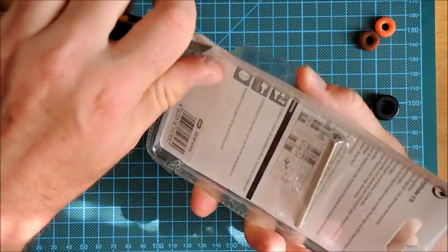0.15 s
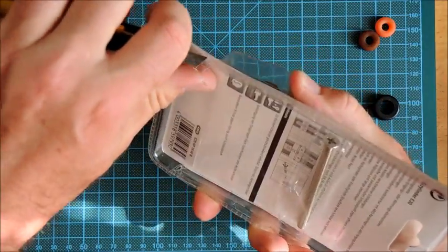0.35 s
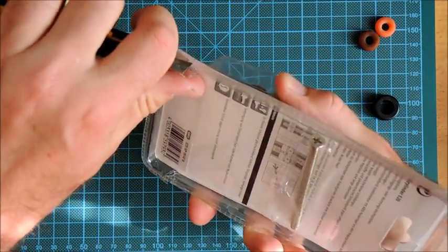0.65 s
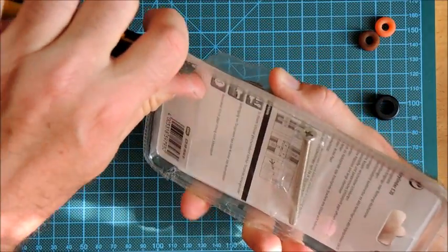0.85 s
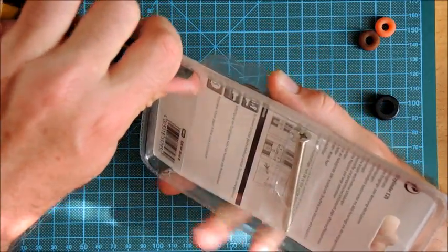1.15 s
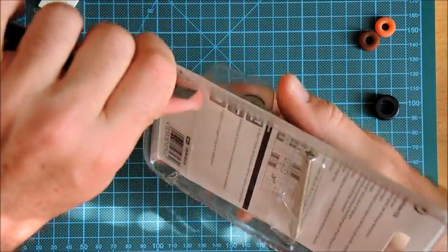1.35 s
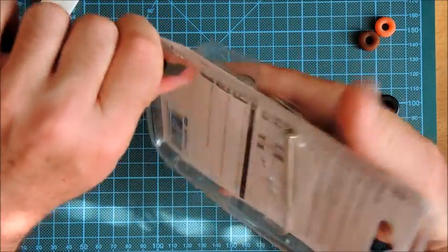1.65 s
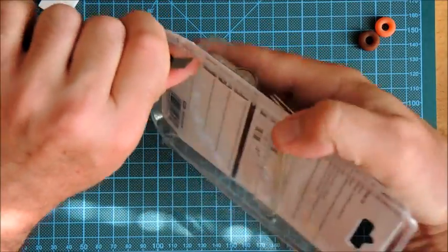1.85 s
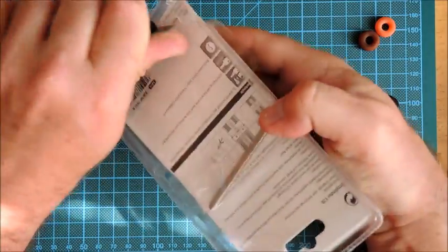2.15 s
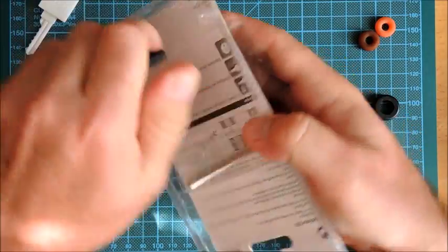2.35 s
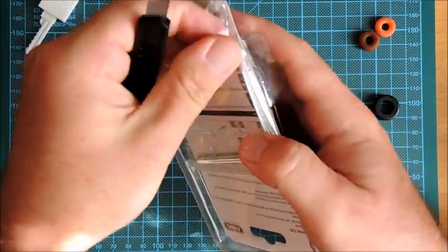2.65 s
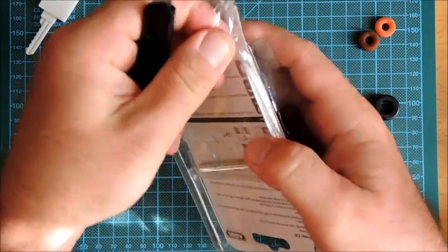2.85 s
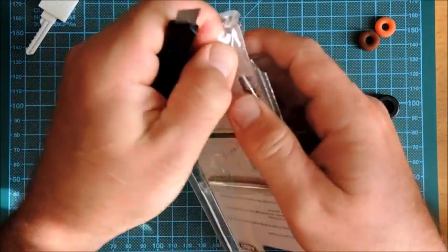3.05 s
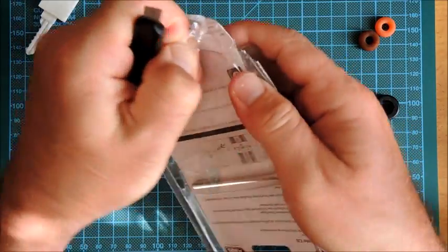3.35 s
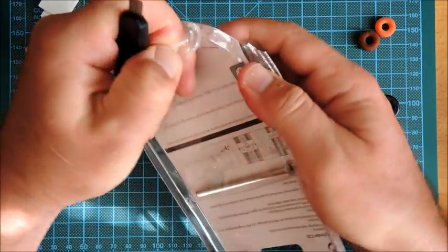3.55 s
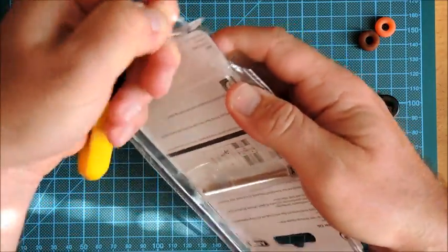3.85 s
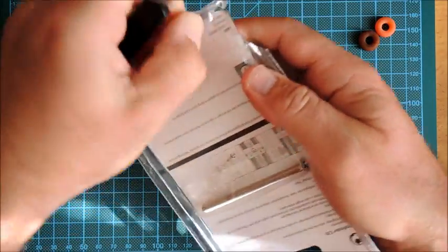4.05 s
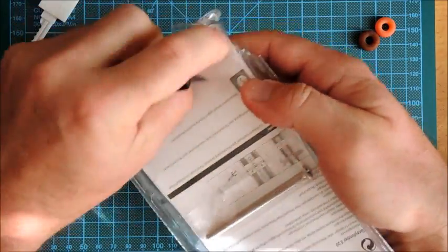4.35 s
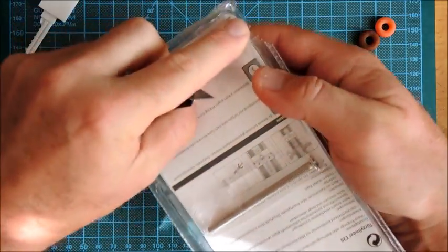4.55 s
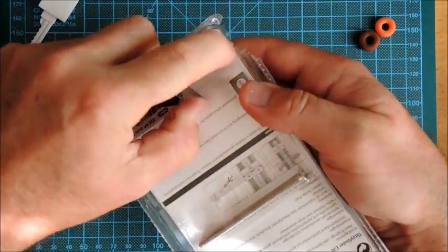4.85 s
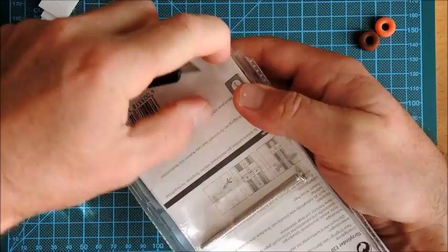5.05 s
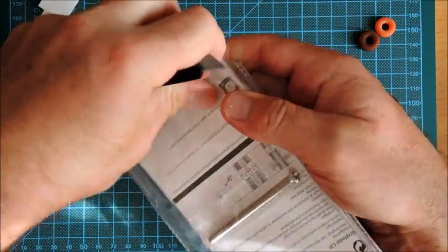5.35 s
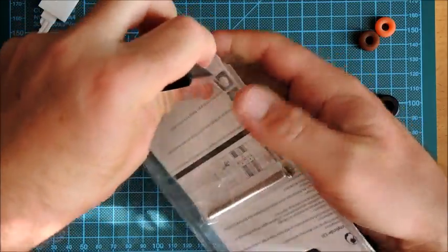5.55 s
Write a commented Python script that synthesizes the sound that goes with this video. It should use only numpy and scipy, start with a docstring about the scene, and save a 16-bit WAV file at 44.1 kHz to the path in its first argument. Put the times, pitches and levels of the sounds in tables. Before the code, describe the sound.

Hands cut and pry a stiff plastic blister pack. Sparse sharp cracks come first, then a quick crackle and a loud snap, scraping, another big snap, a cluster of violent snaps mid-way, soft finger bumps, one more snap, a short creak and final crackling. Close stereo microphone, small room, faint steady room noise.

```python
"""A stiff plastic blister pack is slit with a knife and pried open by hand, heard close up in a small room.
The cut edge cracks in noise bursts with a ping of the rim; whole panels buckle with loud ringing snaps, made of
a crack and two gliding modes, that overload the input. A fingertip creaks over the shell as a train of knocks.
Fingers and knife handle bump the shell, and the hands rub and shift their grip as coloured friction noise.
Resonators ring the hollow pack, decaying noise makes the room, and a steady noise is the room tone."""
import sys
import numpy as np
from scipy import signal
from scipy.fft import rfft, irfft
from scipy.io import wavfile
from scipy.ndimage import uniform_filter1d

SR = 44100
rng = np.random.default_rng(int(sys.argv[2]) if len(sys.argv) > 2 else 0)


def output_pcm(signal):
    """Save a mono or channel-first signal as 16-bit PCM at the path in sys.argv[1].

    Samples are clipped to [-1, 1] before scaling.
    """
    pcm = np.clip(np.atleast_2d(signal).T, -1, 1) * 32767
    wavfile.write(sys.argv[1], SR, np.round(pcm).astype(np.int16))


N = 251370
TIME = np.arange(N) / SR

# Cracks of the cut edge; level is relative, near 1 kHz; edge and fizz are relative to it; the ping is the rim's:
# start_s, level_db, edge_db, fizz_db, ping_hz
EDGE_CRACKS = [(0.2717, -9.5, 8.5, -30, 2820), (0.378, 11.5, 0.5, -14, 2740), (0.385, 7, -2.5, -7.5, 2885),
               (0.4143, 6.5, -1.5, -24, 876), (0.5449, 2, 8, -9, 2380), (0.961, 1, 2, -26, 2670),
               (0.971, 3.5, -15, -17, 2680), (1.0005, 5.5, -7.5, -20, 2800), (1.01, 6, -6, -15, 2690),
               (1.1225, -12, 6, -17, 1880), (1.281, -5, -9, -13, 1094), (1.2935, -9, 7.5, 1, 1100),
               (1.3013, 8.5, -21, -25, 1306), (1.312, -4, 19.5, 1, 4280), (1.366, 3, -8.5, -16, 1050),
               (1.372, -1, -15, -29, 1050), (1.3877, 5, -14, -26, 1090), (1.4085, 2.5, -7, -35, 1090),
               (1.4188, 9.5, -3, -31, 1060), (1.4337, 12.5, -3, -12, 2280), (1.451, 16.5, -6, -12, 2370),
               (1.808, 2.5, -5, -35, 1940), (2.0007, 10.5, -1, -10, 3900), (2.0148, 0, 13.5, 2, 4000),
               (2.0295, 7, 6.5, -8, 4150), (2.0446, 8.5, 3, -4, 4050), (2.0841, 14, 3, -6.5, 4060),
               (2.1578, 18.5, -10, -17, 1566), (2.2682, 8, -2, -23, 2665), (2.3158, -11.5, 8, -16, 2830),
               (2.481, -4.5, 4.5, -3, 2056), (2.9488, -7, 4.5, -7, 4059), (2.9763, -13, 0, -6, 2960),
               (3.013, -14.5, 6, -19, 2940), (3.418, 0, 0, -8, 2336), (3.44, -4, 1, -3, 2336),
               (3.4556, 20, -6.5, -7.5, 1150), (3.5702, -6.5, 6.5, 7, 3770), (4.1499, 7, 1.5, -23.5, 930),
               (4.16, -0.5, -4, -14, 4030), (4.6547, 7, -5, -7.5, 4050), (5.004, 4, -2.5, -33, 2360),
               (5.282, 2.5, -6.5, -15, 4560), (5.364, -1.5, -12, -14, 4700), (5.582, -1.5, 14, -20, 3380),
               (5.599, 5, 6, -31, 3300), (5.605, 3.5, 14.5, -34, 2600), (5.612, 3, 6, -11, 3380),
               (5.625, 3.5, 8.5, -23, 2760), (5.6677, -1.5, -5, -3, 7100), (5.6985, 10.5, -1, -31, 2750)]
# Panels buckling; level is relative, all other dB are relative to it, fizz before a common lift:
# start_s, level_db, bass_db, edge_db, fizz_db, crack_t60_s,
# first_mode_hz, first_mode_db, second_mode_hz, second_mode_db, modes_t60_s
PANEL_SNAPS = [(1.4623, 23, -9, -3.5, -13.5, 0.035, 1136, -9, 2270, -17.5, 0.022),
               (2.162, 30.5, 0.5, -8, -25, 0.007, 1447, -24.5, 1126, -24.5, 0.05),
               (3.2122, 26, -21.5, -11, -17.5, 0.023, 780, -6, 2873, -6.5, 0.0074),
               (3.2834, 23.5, -20, -4.5, -26.5, 0.031, 1010, -15, 1740, -16.5, 0.018),
               (3.468, 31, -9.5, -5.5, -19.5, 0.023, 1410, -6, 1944, -6, 0.011),
               (3.7672, 25.5, -5.5, 3, -8.5, 0.021, 1850, -8.5, 3143, -11, 0.012),
               (3.9388, 17.5, -16.5, -8.5, -24.5, 0.022, 953, -16.5, 704, -18, 0.094),
               (3.964, 0, 6, -9, -29, 0.046, 757, -0.5, 880, -9, 0.11),
               (4.0265, 29, -11.5, -0.5, -22, 0.04, 986, -11, 1825, -10, 0.023),
               (4.6795, 29, -13, -6.5, -14.5, 0.036, 1050, -9.5, 665, -10, 0.009),
               (5.554, 24, -24.5, 4, -5.5, 0.019, 3380, -5.5, 985, -23, 0.011)]
# One drag of the fingertip, which grips harder, nearly sticks, then runs off; level is relative:
# time_s, slips_per_s, level_db, edge_db
FINGERTIP_DRAG = [(5.033, 93, -7, -13), (5.106, 99, -1.5, -19), (5.15, 82.4, -8, -31),
                  (5.185, 80, 4.5, -18.5), (5.21, 41, 6.5, -15), (5.228, 66, 6.5, -12), (5.26, 74, 4, -8),
                  (5.326, 141, 2.5, -3), (5.339, 120, -18, 0), (5.384, 170, -14, -2)]
# Fingers and knife handle bump the shell; bass and edge are relative to the relative level:
# start_s, level_db, bass_db, edge_db
SHELL_TAPS = [(1.001, 7.5, 2, -20), (1.804, -2, 10, -11), (2.6936, -4.5, -3, -3.5), (2.711, -11, -2, -3),
              (2.77, -4.5, 3, -16), (2.7843, -6.5, -20, -9.5), (3.17, 8.5, 2, -10), (3.6902, 5.5, -20, -12),
              (4.2711, 2.5, 1.5, -9), (4.3671, 0.5, -2, -20), (4.377, -6, 0, -2.5), (4.4036, -3, 13, -2),
              (4.424, -12, 16, 1), (4.5073, -1.5, 3.5, 1.5), (4.551, -5, -1, -7), (4.8808, -4.5, 0, -4.5),
              (5.478, -9, 13, -9), (5.5008, -1.5, 8, -6.5)]
# Shifts of the grip, with relative levels: peak_s, die_away_t60_s, scrape_db, grip_db
GRIP_SHIFTS = [(0.028, 0.15, -40, -44), (0.47, 0.21, -42, -41.5), (1.285, 0.71, -41.5, -46),
               (1.631, 0.46, -45.5, -50), (1.695, 0.14, -38, -48), (1.727, 0.16, -33, -41.5),
               (1.809, 0.12, -31.5, -39), (1.901, 0.14, -32, -37.5), (1.985, 0.22, -38, -42),
               (2.298, 0.084, -34.5, -60), (2.675, 0.13, -41.5, -46), (2.706, 0.15, -35, -58),
               (2.774, 0.068, -42, -62), (2.972, 0.73, -53, -55.5), (3.135, 0.6, -42, -52),
               (3.692, 0.08, -42, -33), (4.278, 0.043, -44, -26.5), (4.329, 0.14, -42.5, -45.5),
               (4.405, 0.12, -35.5, -36), (4.508, 0.9, -51, -46), (4.881, 0.4, -47.5, -40),
               (4.989, .16, -44, -45), (5.376, 0.16, -56, -45), (5.48, 0.13, -48, -38.5)]
# Colour that the shell gives to every crack: freq_hz, gain_db
SHELL_COLOUR = [(40, -11), (120, -9.5), (330, 0), (520, -2), (760, -1.5), (1020, -1), (1300, 0),
                (2200, 1.5), (3500, 3.5), (5000, 7.5), (7000, 6), (9000, 0.5), (11000, -9.5),
                (14000, -15.5)]
# The shell under the fingertip: freq_hz, gain_db
KNOCK_COLOUR = [(47, -39), (80, -5.5), (327, -2.5), (445, 3), (662, -5.5), (1000, 5), (1300, -4.5),
                (1700, -23), (3430, -37), (6000, -41), (7800, -73), (13200, -120)]
# Resonances of the whole pack, set off by every crack and snap: freq_hz, gain_db
PACK_RESONANCES = [(325, -11.5), (658, -16.5), (830, -18.5), (1025, -2), (1185, -19.5), (1334, -15.5),
                   (1463, -3.5), (1757, -12.5), (1957, -16.5), (2111, -14.5), (2750, -11), (3442, -6.5),
                   (4046, -6)]
# Spectrum of plastic scraping on plastic: freq_hz, relative_db
SCRAPE_COLOUR = [(410, -56), (700, -30), (1280, -16), (1450, 4), (1910, -3.5), (2300, -5.5), (3070, -2),
                 (4880, -14), (7960, -8), (14000, -64)]
# Resonances that scraping excites: freq_hz, width_hz, relative_db
SQUEAK_RESONANCES = [(1580, 620, -3.5), (1910, 43, 12.5), (2690, 170, -1), (3990, 200, -11),
                     (5220, 220, -7), (8500, 160, -29)]
# Spectrum of the duller rustle of the fingers: freq_hz, relative_db
GRIP_COLOUR = [(41, -53), (70, -34), (337, 15), (759, 19), (923, 21), (1110, 8), (1220, 13.5), (1350, -23),
               (1600, -42), (2080, -36.5), (3520, -120)]
# Bands of the room's response, with relative levels: centre_hz, t60_s, level_db
ROOM_BANDS = [(100.4, 0.25, -8.5), (400, 0.27, -8.5), (1094, 0.27, -6), (2670, 0.26, -7), (4600, 0.28, -12),
              (9400, 0.24, -9.5), (11600, 0.25, -4.5)]
# Spectrum of the room tone: freq_hz, relative_db
ROOM_TONE_COLOUR = [(12, -48), (20, -4), (112, -2), (294, -5.5), (431, -7), (494, -10.5), (536, -10.5),
                    (1060, -12.5), (1160, -13.5), (1330, -15), (1650, -15), (3650, -16.5), (6680, -21),
                    (14000, -28.5)]

BASS_HZ, BODY_LOW_HZ, BODY_HIGH_HZ, EDGE_HZ, FIZZ_HZ = 350, 807, 1510, 3405, 8600  # corners of a crack's tone
# A crack's bass relative to its level, its ring at an edge of 0 dB, and the gain in edge that halves the ring
CRACK_BASS_DB, CRACK_T60_S, HALVING_EDGE_DB = -7.5, 0.023, 31
RING_SHARE = 0.36  # share of a panel's modes that carries into the room
SLIP_T60_S = 0.017  # ring of one slip of the fingertip
PACK_WIDTH_HZ = 26.4  # width of the pack's resonances
RUB_ATTACK_S = 0.032  # a shift of the grip builds up in this time
ROOM_TONE_DB = -51.5  # rms
PORTS_ALIKE_HZ = 2330  # around here the ports start to hear unrelated noise
PORT_LAG = 3  # samples by which the right port hears the pack later
TOP_HZ = 14400


def cut_edge(ping_db=-13, ping_share=0.69, tick_share=0.68):
    """The plastic gives way in single cracks, the brighter the shorter; each also pings the stiff rim by the cut."""
    out = np.zeros(N)
    for start_s, level_db, edge_db, fizz_db, ping_hz in EDGE_CRACKS:
        t60 = CRACK_T60_S * 2 ** (-edge_db / HALVING_EDGE_DB)
        # the ping follows the tilt of its crack from body to edge
        tilt_db = along([(BODY_HIGH_HZ, 0), (EDGE_HZ, edge_db)], ping_hz)
        ping = undb(ping_db + tilt_db) * mode(ping_hz, ping_share * t60)
        burst = crack(CRACK_BASS_DB, edge_db, fizz_db, t60, tick_t60=tick_share * t60)
        add(out, start_s, undb(level_db) * (burst + ping))
    return out


def panels(bright_db=2, settle_db=-24, size=4096):
    """A panel flips over: a crack and two modes whose pitch depends on how it is bent; then it settles."""
    out = np.zeros((2, N))
    for start_s, level_db, bass_db, edge_db, fizz_db, t60, hz1, db1, hz2, db2, ring_t60 in PANEL_SNAPS:
        ring = undb(db1) * mode(hz1, ring_t60) + undb(db2) * mode(hz2, ring_t60)
        snap = crack(bass_db, edge_db, fizz_db + bright_db, t60, tick_db=-1.5, tick_t60=0.022)
        direct = snap + undb(settle_db) * settling(edge_db, fizz_db) + ring
        # the room collects all directions, so the fine peaks and dips average out
        smooth_snap = irfft(causal(timbre(bass_db, edge_db, fizz_db + bright_db, size), size), size)
        around = smooth_snap + RING_SHARE * ring
        add(out, start_s, undb(level_db) * at_ports(direct, around, wet_db=-0.5))
    return out


def settling(edge_db, fizz_db, rate=170, t60=0.2, grain_t60=0.016, size=4096):
    """Tiny cracks that die away while a buckled panel settles."""
    t = np.arange(size) / SR
    hits = (rng.random(size) < rate / SR) * rng.standard_normal(size) * fade(t, t60)
    grain = crack(CRACK_BASS_DB, edge_db, fizz_db, grain_t60, tick_t60=grain_t60)
    return signal.fftconvolve(hits, grain)[:size]


def crack(bass_db, edge_db, fizz_db, t60, tick_db=-5, tick_t60=0.017, damping_hz=7500, size=4096):
    """A sharp release of stress, then the shell's dense bending waves, which hold little treble."""
    t = np.arange(size) / SR
    tick, waves = rng.standard_normal((2, size))
    waves = signal.sosfilt(signal.butter(2, damping_hz, fs=SR, output="sos"), waves)
    tick = undb(tick_db) * unit(tick * fade(t, tick_t60))
    burst = rfft(unit(tick + unit(waves * fade(t, t60))))
    # the sudden step feeds all broad bands alike; only the fine modes differ from crack to crack
    uneven_db = 10 * np.log10(uniform_filter1d(np.abs(burst) ** 2, size=50))
    tone_db = timbre(bass_db, edge_db, fizz_db, size) - uneven_db
    return irfft(burst * causal(tone_db, size), size)


def timbre(bass_db, edge_db, fizz_db, size):
    """Broad spectrum of a crack in dB, coloured by the shell."""
    tone = [(BASS_HZ, bass_db), (BODY_LOW_HZ, 0), (BODY_HIGH_HZ, 0), (EDGE_HZ, edge_db), (FIZZ_HZ, fizz_db)]
    return along(tone, bins(size)) + along(SHELL_COLOUR, bins(size))


def mode(hz, t60, rise_s=0.003, stiffen=0.26, relax_s=0.00099, size=4096):
    """One bending mode: it swings up quickly and sinks to its pitch as the bend relaxes."""
    t = np.arange(size) / SR
    pitch_hz = hz * (1 + stiffen * np.exp(-t / relax_s))
    phase = 2 * np.pi * np.cumsum(pitch_hz) / SR
    return unit(np.sin(phase) * fade(t, t60) * (1 - np.exp(-t / rise_s)))


def pack(x, plain_db=-1.0):
    """The hollow pack rings on at its own resonances."""
    out = undb(plain_db) * x
    for hz, db in PACK_RESONANCES:
        out = out + undb(db) * resonate(x, hz, PACK_WIDTH_HZ)
    return out


def fingertip(jitter_s=0.00017, scatter_db=2.1, rasp_db=-3, size=4096):
    """Skin sticks and slips; every slip knocks the shell a little differently, faster and brighter at the end."""
    out = np.zeros(N)
    times, rate, level_db, edge_db = np.transpose(FINGERTIP_DRAG)
    knock = irfft(causal(along(KNOCK_COLOUR, bins(size)), size), size)
    t = np.linspace(times[0], times[-1], num=size)
    slips_so_far = np.cumsum(np.interp(t, times, rate)) * (t[1] - t[0])
    for k in range(int(np.ceil(slips_so_far[-1]))):
        late, strength = rng.standard_normal(2)
        s = np.interp(k, slips_so_far, t) + jitter_s * late
        edge = np.interp(s, times, edge_db)
        rasp = crack(bass_db=4.5, edge_db=edge, fizz_db=edge - 27, t60=SLIP_T60_S)
        slip_db = np.interp(s, times, level_db) + scatter_db * strength
        add(out, s, undb(slip_db) * (knock + undb(rasp_db) * rasp))
    return out


def taps(fizz_db=-23, t60=0.026):
    """Soft contacts knock the same shell with more bass and little fizz."""
    out = np.zeros(N)
    for start_s, level_db, bass_db, edge_db in SHELL_TAPS:
        add(out, start_s, undb(level_db) * crack(bass_db, edge_db, edge_db + fizz_db, t60))
    return out


def hands(scrape_gain_db=-6, squeak_db=-2, grip_gain_db=-2, crinkle_db=-4):
    """Plastic scrapes on plastic with a slight squeak and tiny crinkles; the fingers shift with a duller rustle."""
    slips = friction(rate=360, spread_db=3.0, grain_t60=0.025)
    squeak = sum(undb(db) * resonate(slips, hz, width) for hz, width, db in SQUEAK_RESONANCES)
    crinkle = colour(friction(rate=110, spread_db=7, grain_t60=0.0127), SHELL_COLOUR)
    scrape = colour(slips, SCRAPE_COLOUR) + undb(squeak_db) * squeak / squeak.std() + undb(crinkle_db) * crinkle
    grip = colour(friction(rate=240, spread_db=2.5, grain_t60=0.065), GRIP_COLOUR)
    out = np.zeros(N)
    for peak_s, t60, scrape_db, grip_db in GRIP_SHIFTS:
        rustle = scrape * undb(scrape_db + scrape_gain_db) + grip * undb(grip_db + grip_gain_db)
        out += rub(peak_s, t60) * rustle
    return out


def rub(peak_s, t60):
    """Effort of one shift of the grip: a quick swell up to its peak that dies away."""
    swell = np.clip(1 + (TIME - peak_s) / RUB_ATTACK_S, 0, 1) ** 2
    return swell * fade(np.maximum(TIME - peak_s, 0), t60)


def friction(rate, spread_db, grain_t60):
    """Dense tiny slips (rate per s) of uneven size, each with a short noisy ring."""
    sizes = undb(spread_db * np.minimum(rng.exponential(size=N), 4))
    slips = (rng.random(N) < rate / SR) * sizes
    power = signal.fftconvolve(slips ** 2, fade(TIME[:2048], grain_t60) ** 2)[:N]
    return np.sqrt(np.abs(power)) * rng.standard_normal(N)


def at_ports(direct, around, wet_db, left_db=-1.0, scatter_db=0.0):
    """Direct sound and room on both ports; the pack lies a little to the left, so the right port hears it later."""
    out = undb(wet_db) * signal.fftconvolve(around[None], room(), axes=1)
    out[0, :len(direct)] += undb(left_db) * direct
    out[1, PORT_LAG:PORT_LAG + len(direct)] += direct
    # short waves leave the creased shell in all directions, so each port gets some treble of its own
    treble = signal.butter(2, [4800, 8500], "band", fs=SR, output="sos")
    own = signal.sosfilt(treble, direct) * rng.standard_normal((2, len(direct)))
    out[:, :len(direct)] += undb(scatter_db) * signal.sosfilt(treble, own)
    return out


def room(first_s=0.0046, build_s=0.002, size=16384):
    """Response of the room: desk and near walls answer within milliseconds, then each band dies away."""
    t = np.arange(size) / SR
    noise = rfft(diffuse(size, likeness=0.98))
    onset = np.clip((t - first_s) / build_s, 0, 1)
    centres = [row[0] for row in ROOM_BANDS]
    tail = np.zeros((2, size))
    # each row of the identity matrix opens one band, cross-faded into its neighbours
    for share, (_, t60, db) in zip(np.eye(len(ROOM_BANDS)), ROOM_BANDS):
        band = irfft(noise * along(list(zip(centres, share)), bins(size)), size)
        tail += undb(db) * band * unit(onset * fade(t, t60))
    return tail


def room_tone():
    """Steady coloured noise from all around."""
    return undb(ROOM_TONE_DB) * colour(diffuse(N, likeness=0.42), ROOM_TONE_COLOUR)


def diffuse(size, likeness):
    """Noise from all around on two close ports: alike in the bass, unrelated in the treble."""
    alike = np.clip(likeness, 0, 1) / (1 + (bins(size) / PORTS_ALIKE_HZ) ** 2)
    mid, side = rfft(rng.standard_normal((2, size))) * np.sqrt([1 + alike, 1 - alike])
    return irfft(np.array([mid + side, mid - side]), size) / np.sqrt(2)


def resonate(x, hz, width_hz):
    """One resonance, driven by a sound."""
    return signal.lfilter(*signal.iirpeak(hz, hz / width_hz, fs=SR), x)


def causal(db, size):
    """Minimum-phase response for a gain curve: nothing sounds before the blow."""
    cepstrum = irfft(np.log(undb(db)), size)
    cepstrum[1:size // 2] *= 2
    cepstrum[size // 2 + 1:] = 0
    return np.exp(rfft(cepstrum))


def colour(x, points):
    """Give a steady sound a spectrum, at rms one."""
    y = irfft(rfft(x) * undb(along(points, bins(N))), N)
    return y / y.std()


def fade(t, t60):
    """Exponential decay by 60 dB in t60 seconds."""
    return np.exp(-np.log(1000) * t / max(t60, 1e-3))


def add(track, s, sound):
    """Mix a sound in at a time in seconds."""
    i = int(np.clip(s * SR, 0, N - 1))
    track[..., i:i + sound.shape[-1]] += sound[..., :N - i]


def along(points, hz):
    """Read (Hz, value) points on a log-frequency axis."""
    f, value = np.transpose(points)
    return np.interp(np.log(np.maximum(hz, 1)), np.log(f), value)


def bins(size):
    """Frequencies of a spectrum in Hz."""
    return np.fft.rfftfreq(size, 1 / SR)


def undb(db):
    """Decibels to gain."""
    return 10 ** (np.asarray(db) / 20)


def unit(x):
    """Scale to an energy of one."""
    return x / np.sqrt(np.sum(x ** 2))


def scene():
    """Cracks, taps, handling and the loud snaps ring the pack; the fingertip creaks close by, over the room tone."""
    small = pack(cut_edge() + taps() + hands())
    creak = fingertip()
    near = at_ports(small, small, wet_db=-1) + at_ports(creak, creak, wet_db=-1.5)
    return near[:, :N] + pack(panels()) + room_tone()


def record(dry, lopsided=0.078):
    """The loudest snaps overload the input unevenly, which adds a low thump, and clip at full scale; the top is cut."""
    bent = dry + lopsided * np.tanh(dry ** 2) ** 2
    clipped = np.clip(bent, -1, 1)
    return signal.sosfilt(signal.ellip(8, 0.2, 60, TOP_HZ, fs=SR, output="sos"), clipped)


dry = scene()
out = record(dry)
output_pcm(out)
```